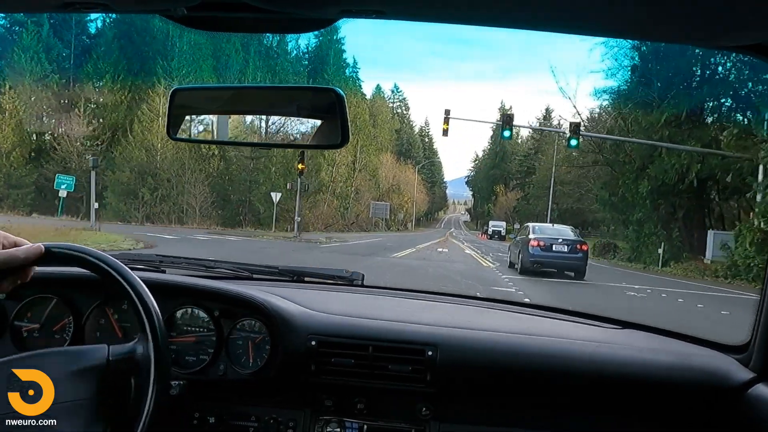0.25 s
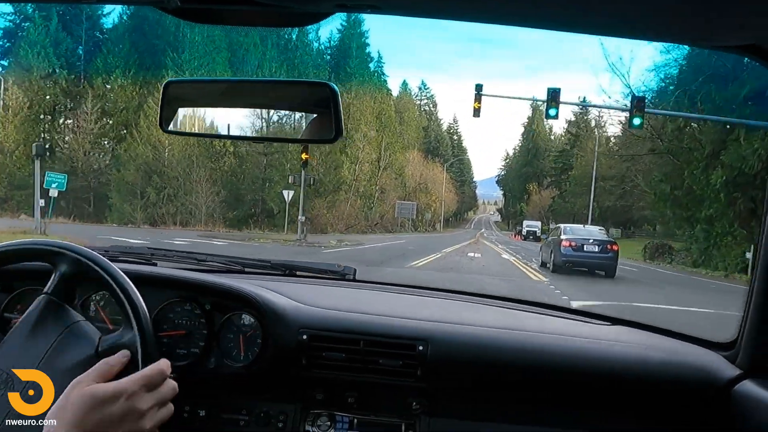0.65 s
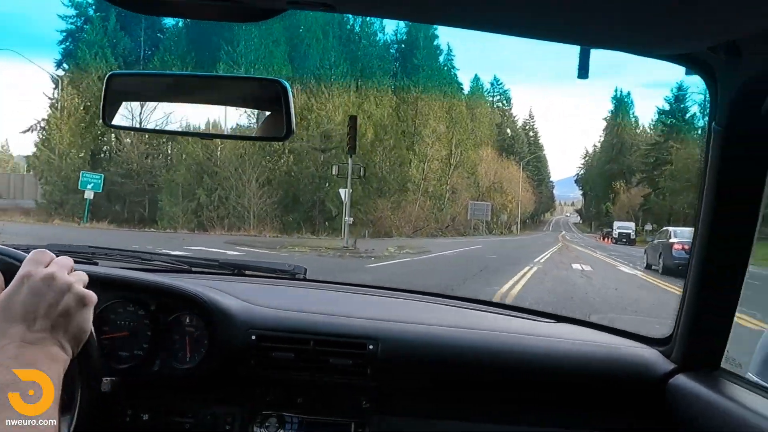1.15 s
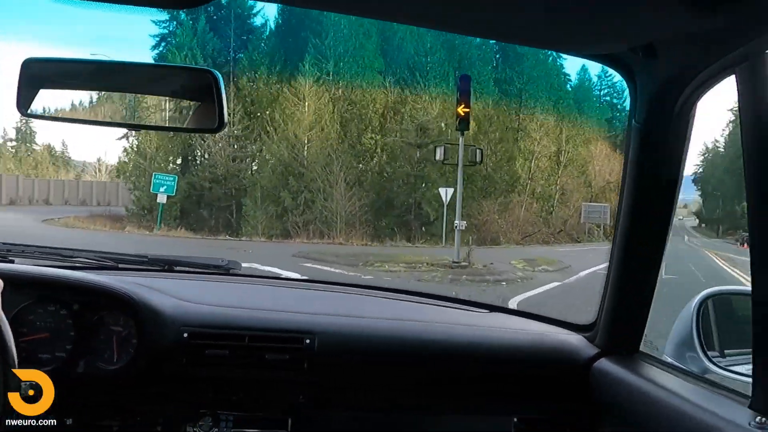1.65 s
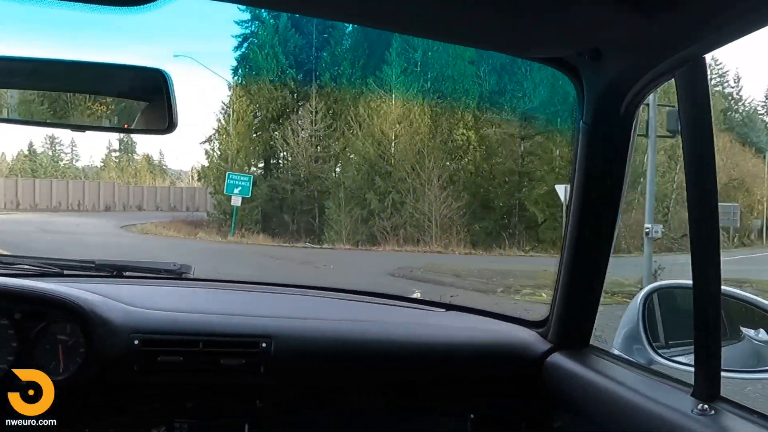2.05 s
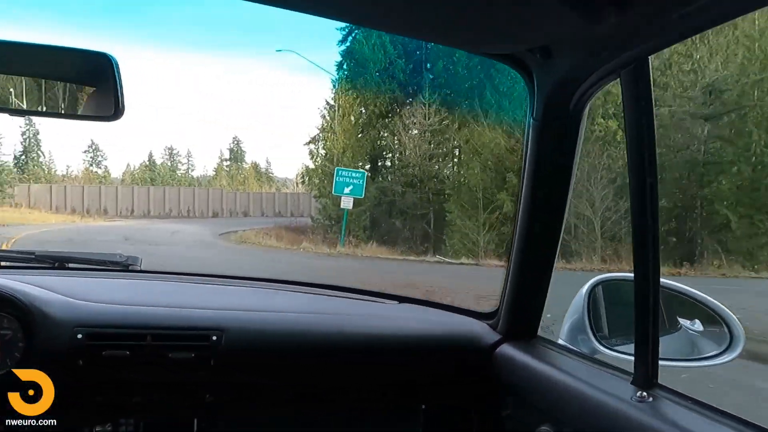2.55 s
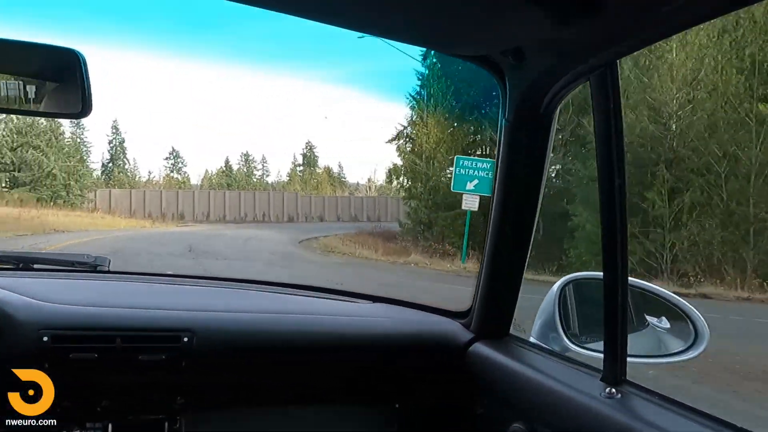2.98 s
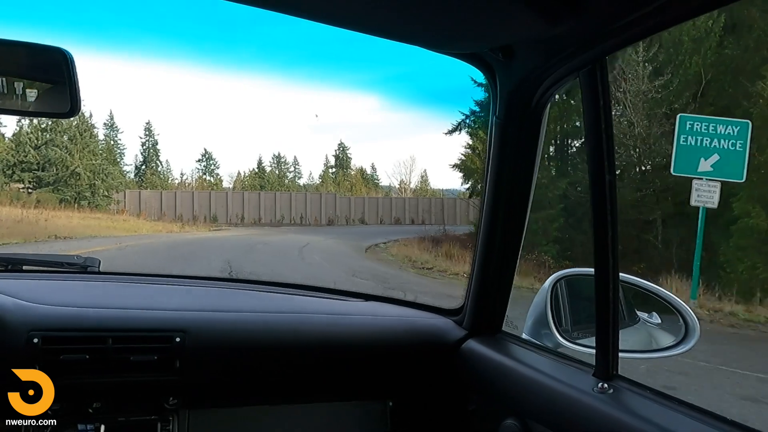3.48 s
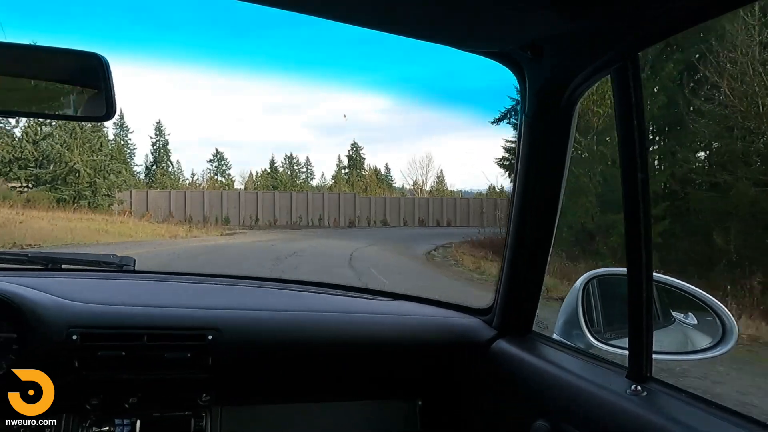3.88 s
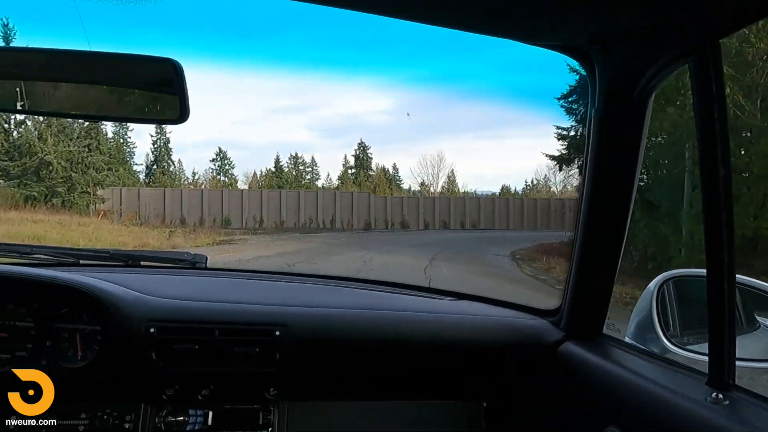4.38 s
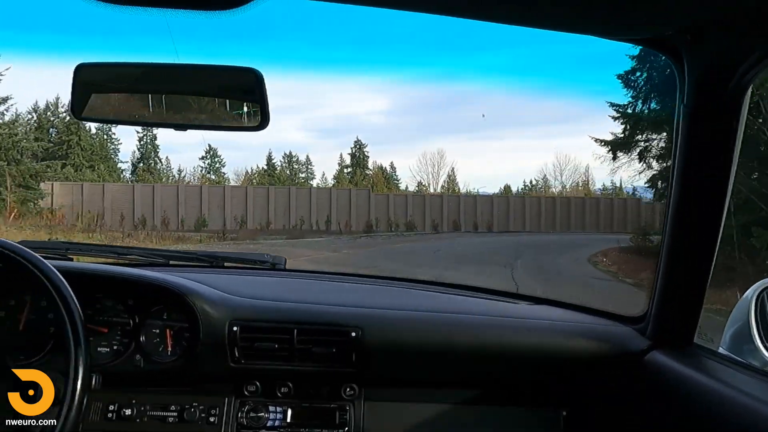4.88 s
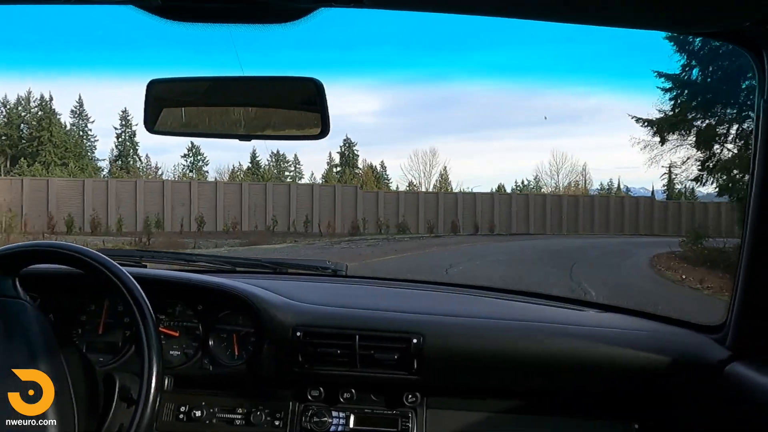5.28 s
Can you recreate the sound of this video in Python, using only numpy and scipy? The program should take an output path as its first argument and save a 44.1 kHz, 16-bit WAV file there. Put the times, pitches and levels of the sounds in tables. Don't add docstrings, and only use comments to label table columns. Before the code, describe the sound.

From the back of a closed car cabin, a six-cylinder engine hums low and sags as the car coasts into a turn. Hands slap and rub the steering wheel and a stalk clicks. Tyres thud over rough patches midway, then a snap precedes a strong, smooth rise of engine pitch and roar, which finally eases off. Close, boomy, dull-topped mono sound.

```python
import sys
import numpy as np
from scipy import signal
from scipy.fft import rfft, irfft, next_fast_len
from scipy.io import wavfile
from scipy.ndimage import uniform_filter1d

SR = 44100
rng = np.random.default_rng(int(sys.argv[2]) if len(sys.argv) > 2 else 0)


def nominal_scale(level):
    x = np.asarray(level, float) / 20
    return 10 ** x


def to_wav(s):
    ch = np.atleast_2d(s).T
    pcm = np.round(np.clip(ch, -1, 1) * 32767)
    wavfile.write(sys.argv[1], SR, pcm.astype(np.int16))


N = 243873

FIRING, BEAT, FAN, FAN_WHINE = 6, 9, 9.36, 28.08

# time in seconds, load in dB, firing tone in dB rms.
ENGINE_LOAD = [(0, -5.5, -40), (.45, -6, -28.5), (1.05, -6.5, -27), (1.3, -7.5, -27), (1.55, -11.5, -36),
               (1.85, -5.5, -30.5), (2.1, -0.5, -36), (2.35, -3, -50), (2.8, -8.5, -30.5),
               (3.15, -4, -34.5), (3.45, -5, -24.5), (3.95, 1.5, -19.5), (4.25, 0, -26), (4.55, -3, -24),
               (4.9, -3, -20.5), (5.15, -4, -30.5), (5.35, -9.5, -28), (5.53, -6.5, -57)]
# time in seconds, camshaft rate in turns per second.
CAMSHAFT_SPEED = [(0, 24.85), (.25, 24.01), (.65, 22.78), (.85, 22.49), (1.25, 22.02), (1.45, 21.95),
                  (1.75, 22.27), (2.05, 22.49), (2.25, 22.98), (2.75, 24.76), (3.25, 26.73), (3.85, 29.91),
                  (4.35, 33.09), (4.75, 35.15), (4.95, 35.67), (5.1, 35.62), (5.25, 34.94), (5.53, 31.9)]
# centre in Hz, width in Hz, gain in dB.
CABIN_MODES = [(101, 12, 10.5), (139, 18, 6.5), (164, 9.9, 5), (233, 31, 5.5), (285, 15, 6.5),
               (412.6, 33, 7.5), (458.3, 27.3, 14), (664, 36, 3.5), (953, 22, 4.5), (1152, 37, 6.5),
               (1370, 53, 5.5), (1725, 40, 4), (2450, 73, 6), (2738, 54, 5.5)]


def amp_sum(modes, hz):
    return nominal_scale(sum(db * np.exp(-2 * ((hz - f) / width) ** 2) for f, width, db in modes))


def evened(x):
    return x / np.sqrt(np.mean(x ** 2) + 1e-20)


def read(points, hz):
    f, value = np.transpose(points)
    return np.interp(np.log(hz + 1), np.log(f + 1), value)


def curves(rows, step=1):
    s, *columns = np.transpose(rows)
    return [np.interp(np.arange(0, N, step) / SR, s, c) for c in columns]


def bell(s, length, step=1):
    return np.exp(-2 * ((np.arange(0, N, step) / SR - s) / length) ** 2)


def drift(rate_hz, step=1):
    t = np.arange(0, N + 256, 256) / SR
    slow = 0
    for f in rate_hz * np.geomspace(.1, 1, num=12):
        slow = slow + np.sin(2 * np.pi * (f * t + rng.random())) / np.sqrt(f)
    return np.interp(np.arange(0, N, step) / SR, t, evened(slow))


def noise(gain, patchy_db, flicker_db, size=1024):
    frames, hz = 4 * N // size + 5, np.fft.rfftfreq(size, 1 / SR)
    a, b, patches = rng.standard_normal((frames, len(hz), 3)).T
    patches = uniform_filter1d(patches, size=8, axis=0)
    patches = evened(uniform_filter1d(patches, size=10, axis=1))
    flicker = evened(uniform_filter1d(rng.standard_normal(frames), size=3))
    z = (a + 1j * b) * gain(hz)[:, None] * nominal_scale(patchy_db * patches + flicker_db * flicker)
    return evened(signal.istft(z, nperseg=size, noverlap=3 * size // 4)[1][:N])


def add(mix, s, sound):
    part = mix[round(s * SR):][:len(sound)]
    part += sound[:len(part)]


def doublings():
    coast_speed = 23.
    return np.log2(curves(CAMSHAFT_SPEED)[0] / coast_speed)


def engine(load_share=1.0, minor_db=-2.0):
    # multiple of the camshaft rate, level in dB rms.
    order_fall = [(2, -55.5), (5, -34.5), (10, -39), (20, -49.5), (45, -59.5)]
    # multiple, time in seconds, length in seconds,
    # level in dB rms.
    order_swells = [(15, 3.95, .5, -24.5), (15, 5.05, .45, -35), (15, 3.2, .5, -37), (14, 4.52, .45, -30),
                    (12, 4.3, .5, -31), (12, 4.8, .4, -32), (12, 5.08, .2, -28), (12, .55, .4, -32),
                    (12, 2.4, .2, -33), (13, 4.15, .3, -38), (5, 4.75, .7, -26), (7, 4.38, .25, -29),
                    (8, 3.7, .4, -33), (10, 4.8, .5, -34), (18, 2.2, .4, -37), (18, 3.1, .5, -39),
                    (21, 2.1, .4, -39), (21, 4.35, .3, -38), (24, 3.75, .4, -41), (24, .2, .5, -43),
                    (40, 3.6, .7, -43.5), (39, 4.7, .6, -47), (41, .35, .4, -46), (39, 3.65, .5, -47),
                    (33, 3.7, .5, -47), (36, 3.5, .8, -50), (44, 4.0, .4, -50), (27, 3.7, .5, -45)]
    # multiple, time in seconds, length in seconds, level in dB rms.
    tone_swells = [(BEAT, 0.14, 0.53, -30), (BEAT, 1.7, 1.1, -37), (BEAT, 3.7, 0.63, -29.5),
                   (BEAT, 5.1, 0.38, -34.5), (FAN, 0.2, .45, -30.5), (FAN, 4.35, 0.77, -29.5),
                   (FAN, 5.34, .9, -26), (FAN_WHINE, 1.1, 1.5, -43), (FAN_WHINE, 3.6, 0.19, -41),
                   (FAN_WHINE, 4.55, .4, -42.5), (FAN_WHINE, 5.5, .25, -43.5)]
    bank_db = 7

    hz = curves(CAMSHAFT_SPEED, step=256)[0]
    load_db, firing_db = curves(ENGINE_LOAD, step=256)

    def fine(slow):
        return np.interp(np.arange(0, N, 8), np.arange(0, N, 256), slow)

    turns = 8 * np.cumsum(fine(hz * (1 + .001 * drift(10., step=256)))) / SR
    own_db = {FIRING: firing_db, BEAT: -43.5, FAN: -40, FAN_WHINE: -60.5}
    out = 0
    for k in [*range(2, 46), FAN, FAN_WHINE]:
        uneven = drift(16., step=256)
        swell = sum(nominal_scale(db) * bell(s, length, step=256)
                    for order, s, length, db in order_swells + tone_swells if order == k)
        if k in own_db:
            gain = (nominal_scale(own_db[k]) + swell) * nominal_scale(.6 * uneven)
        else:
            order_db = read(order_fall, k) + bank_db * (k % 3 == 0)
            weak = nominal_scale(order_db + minor_db + load_share * load_db + 2.6 * uneven)
            weak = weak * amp_sum(CABIN_MODES, k * hz)
            gain = np.maximum(weak, swell * nominal_scale(.7 * uneven))
        out = out + np.sqrt(2) * fine(gain) * np.sin(2 * np.pi * (k * turns + rng.random()))
    return signal.resample_poly(out, up=8, down=1)[:N]


def road_levels():
    # time in seconds, length in seconds, thud in dB, rumble in dB.
    bumps = [(0, 0.2, 3.5, 0.5), (.3, .2, -4, 0), (.8, 0.27, 3, 0), (1.14, 0.12, 6, -0.5),
             (1.45, 0.37, 8.5, 3.5), (1.75, 0.22, 3, 2), (1.993, 0.067, 6, 1.5), (2.092, .07, -5, -2.5),
             (2.194, 0.13, 14.5, 4.5), (2.366, .12, 13, 5), (2.632, 0.074, 1.5, 2.5), (2.918, 0.071, 1, 1),
             (3.134, 0.19, -8, -5), (3.42, 0.093, 6.5, -4), (3.5, 0.062, -5, -1), (3.75, .35, 5, -10),
             (4.249, .25, 11.5, 3.5), (4.45, 0.18, -9, 5), (4.829, .12, 7.5, 2), (4.942, 0.13, 6.5, 2.5),
             (5.38, 0.24, 9.5, 0)]
    # time in seconds, length in seconds, level in dB.
    heaves = [
        (.3, .3, 0),
        (1.3, .15, 2.5),
        (2.452, .5, 8),
        (2.9, 0.33, 5.5),
        (3.401, .55, -9),
        (4.2, .8, 4),
        (4.599, .25, 2),
    ]
    bump_db, rough_db = sum(np.outer([a, b], bell(s, length)) for s, length, a, b in bumps)
    faster, load_db = doublings(), curves(ENGINE_LOAD)[0]
    grit_db = 0.11 * bump_db
    open_s, rise_s = 3.39, .06
    pull = (1 + np.tanh((np.arange(N) / SR - open_s) / rise_s)) / 2
    heave_db = -45 + sum(db * bell(s, length) for s, length, db in heaves)
    thud_db = -37.5 + bump_db
    rumble_db = -28.5 + 4.5 * faster + rough_db
    roar_db = -34 + 5 * faster + .15 * load_db + grit_db + 1.5 * pull
    hiss_db = -50 + 4.5 * faster + 0.12 * load_db + grit_db + 3.5 * pull
    return heave_db, thud_db, rumble_db, roar_db, hiss_db


def road():
    # frequency in Hz, density in dB per Hz.
    road_tone = [(12, -37), (20, -22.5), (54, -16), (129, 2.5), (201, 0.5), (232, 5), (312, -3),
                 (455, -7.5), (505, -11), (636, -15.5), (927, -20.5), (1010, -21), (3000, -42.5),
                 (3900, -65.5), (6600, -120)]
    # frequency in Hz, density in dB per Hz.
    hiss_tone = [(880, -16.5), (1500, 0), (2090, -11.5), (2590, -12), (2800, -7), (2950, -9.5), (3830, -12),
                 (4790, -28), (5540, -23.5), (8500, -51), (11000, -63), (18700, -120)]
    heave_db, thud_db, rumble_db, roar_db, hiss_db = road_levels()

    body = lambda hz: nominal_scale(read(road_tone, hz)) * amp_sum(CABIN_MODES, hz) ** .5
    deep = lambda hz: 1 / (1 + (hz / 62) ** 6)
    lowest = lambda hz: 1 / (1 + (hz / 115) ** 6)
    low = lambda hz: 1 / (1 + (hz / 380) ** 4)
    heave_colour = lambda hz: body(hz) * deep(hz)
    thud_colour = lambda hz: body(hz) * (lowest(hz) - deep(hz))
    rumble_colour = lambda hz: body(hz) * (low(hz) - lowest(hz))
    roar_colour = lambda hz: body(hz) * (1 - low(hz))
    hiss_colour = lambda hz: nominal_scale(read(hiss_tone, hz)) * amp_sum(CABIN_MODES, hz)

    out = nominal_scale(heave_db) * noise(heave_colour, patchy_db=.8, flicker_db=.8, size=2048)
    out += nominal_scale(thud_db) * noise(thud_colour, patchy_db=.8, flicker_db=.8, size=2048)
    out += nominal_scale(rumble_db) * noise(rumble_colour, patchy_db=.8, flicker_db=.7, size=2048)
    out += nominal_scale(roar_db) * noise(roar_colour, patchy_db=.8, flicker_db=.5)
    out += nominal_scale(hiss_db) * noise(hiss_colour, patchy_db=1.05, flicker_db=0.84, size=512)
    return out


def gears():
    # multiple of the camshaft rate, time in seconds, length in seconds, peak level in dB.
    meshes = [
        (116.5, .12, .45, -56),
        (70.2, .1, .4, -58),
        (77.75, 4.97, .15, -46.5),
        (77.75, 4.76, .25, -53),
        (77.75, 5.23, .17, -50),
    ]
    turns = np.cumsum(curves(CAMSHAFT_SPEED)[0] * (1 + .0025 * drift(30.))) / SR
    out = 0
    for k, s, length, db in meshes:
        flicker_db = 1.8 * drift(45.)
        out = out + nominal_scale(db + flicker_db) * bell(s, length) * np.sin(2 * np.pi * k * turns)
    return out


def snaps(lead=.025):
    # time in seconds, peak in dB, centre in Hz, t60 in seconds.
    slaps = [(.277, -56, 7000, .12), (0.3705, -20.5, 3700, .12), (.604, -48, 5500, 0.055),
             (0.6669, -11.5, 3190, 0.11), (1.018, -37, 4000, 0.079), (1.03, -36, 3700, 0.26),
             (1.061, -37.5, 3200, 0.23), (1.246, -55, 4500, .06), (1.262, -38, 4470, .14),
             (1.328, -53, 6000, 0.068), (1.64, -23, 3440, 0.096), (1.671, -37.5, 4830, 0.081),
             (2.054, -38.5, 3350, 0.076), (2.2, -39, 3500, 0.087), (2.373, -40.5, 4000, .07),
             (2.991, -42, 5630, 0.041), (3.348, -48, 6450, 0.044), (3.41, -23, 3140, .16),
             (3.424, -20.5, 3410, .22), (4.0, -46, 5550, 0.052), (4.342, -51, 7060, .05)]
    # time in seconds, peak in dB, centre in Hz.
    ticks = [
        (0.2176, -35, 5270),
        (.945, -34, 5060),
        (2.022, -46, 4940),
        (2.398, -36, 5100),
        (2.712, -42, 5440),
        (2.737, -35, 3960),
        (3.125, -41, 5200),
        (5.445, -28, 3030),
    ]
    edge_hz, least_octaves = 5800, .55
    tick_octaves, tick_t60 = 0.38, .054
    bursts = [(s, db, f, max(np.log2(edge_hz / f), least_octaves), t60) for s, db, f, t60 in slaps]
    bursts += [(s, db, f, tick_octaves, tick_t60) for s, db, f in ticks]

    out, t, hz = np.zeros(N), np.arange(8192) / SR - lead, np.fft.rfftfreq(8192, 1 / SR)
    for s, db, centre_hz, spread, t60 in bursts:
        octaves = np.log2((hz + 1) / centre_hz) / spread
        skirt = np.where(octaves < 0, .15, 1)
        colour = 1 / (1 + skirt * octaves ** 4) / (1 + (hz / 15000) ** 8)
        white, grain, bands = rng.standard_normal((3, len(t)))
        colour = colour * nominal_scale(1.8 * evened(uniform_filter1d(bands, size=80))[:len(hz)])
        grainy = white * nominal_scale(1.3 * evened(uniform_filter1d(grain, size=40)))
        burst = evened(irfft(rfft(grainy) * (colour + 0.012)))
        after = np.maximum(t - .045 * t60, 0)
        lead_in = nominal_scale(-28.0) * np.clip(1 + t / lead, 0, 1)
        rise = np.clip(t / (.014 * t60), 0, 1) ** 2 + lead_in
        decay = nominal_scale(-60 * after / (0.27 * t60)) + 0.75 * nominal_scale(-60 * after / t60)
        add(out, s - lead - .0005, nominal_scale(db - 15.0) * burst * rise * decay)
    return out


def rub():
    # frequency in Hz, density in dB per Hz.
    rub_tone = [(1000, -17.5), (2500, -1.5), (4500, 7.5), (7000, -3.5), (11000, -21), (12000, -19.5),
                (13000, -35.5), (15000, -56.5)]
    # time in seconds, length in seconds, level in dB.
    strokes = [
        (.36, 0.34, 7),
        (1.12, 0.43, 9.5),
        (2.26, 0.64, 2),
        (3.452, 0.17, 3),
        (4.1, .4, 2),
    ]
    slide = noise(lambda hz: nominal_scale(read(rub_tone, hz)), patchy_db=2.0, flicker_db=1.2, size=512)
    stroke_db = sum(db * bell(s, length) for s, length, db in strokes)
    return nominal_scale(-66 + 1.3 * drift(25.) + 10 * doublings() + stroke_db) * slide


def tocks():
    # time in seconds, dB rms of the first 5 ms, brightness in dB per octave.
    knocks = [
        (.7013, -27.5, 7),
        (.8674, -27.5, -3.5),
        (1.3857, -22.5, -4.5),
    ]
    # frequency in Hz, level in dB, t60 in seconds.
    modes = [(760, -5, .02), (940, 0, .03), (1070, -3, .025), (1200, -3, .025), (1510, 1, .03),
             (1800, -2, .022), (2310, -5, .018), (2730, -8, .015), (3170, -9, .015), (3700, -10, .012),
             (4400, -13, .01)]
    out, t = np.zeros(N), np.arange(4096) / SR
    for s, db, bright_db in knocks:
        ring = 0
        for k, (f, mode_db, t60) in enumerate(modes):
            level = nominal_scale(mode_db + bright_db * np.log2(f / 1500) - 70 * t / t60)
            ring = ring + (-1) ** k * level * np.sin(2 * np.pi * f * t)
        rattle = rng.standard_normal(len(t)) * nominal_scale(-26 - 60 * t / .07)
        rattle[0] = 1
        softened = signal.fftconvolve(ring, np.hanning(11))
        tock = signal.fftconvolve(softened, rattle)[:len(t)]
        add(out, s, nominal_scale(db) * tock / np.sqrt(np.mean(tock[:SR // 200] ** 2)))
    return out


def scene():
    return (engine() + road() + gears() + snaps() + rub() + tocks())[None]


def top_cut(x):
    return signal.sosfilt(signal.butter(12, 14210, fs=SR, output="sos"), x)


def record(dry):
    # centre in Hz, width in Hz, gain in dB.
    housing = [(8970, 660, -6.5), (9120, 160, -9), (11070, 1100, 8), (15500, 3100, -12)]
    size = next_fast_len(N + 4096)
    response = amp_sum(housing, np.fft.rfftfreq(size, 1 / SR))
    coloured = irfft(rfft(dry, size) * response, size)[:, :N]
    return top_cut(coloured)


dry = scene()
out = record(dry)
to_wav(out)
```